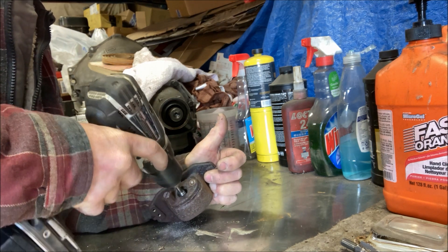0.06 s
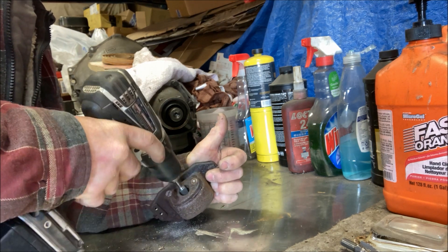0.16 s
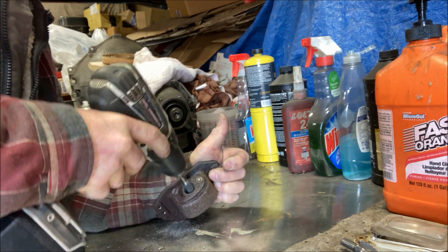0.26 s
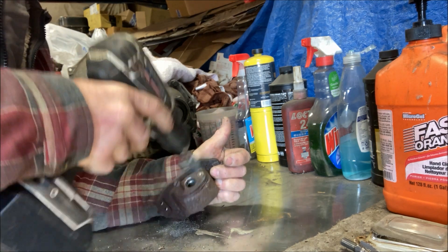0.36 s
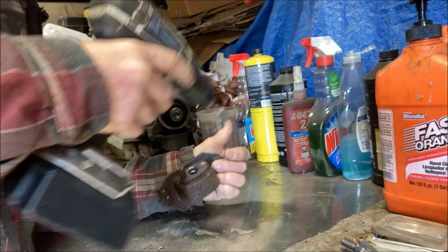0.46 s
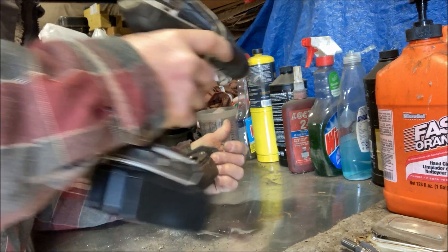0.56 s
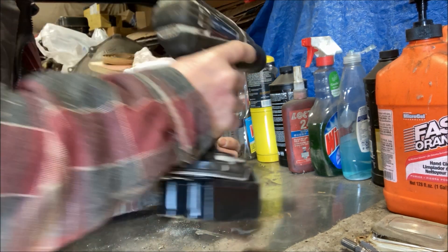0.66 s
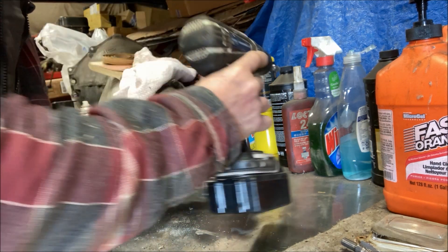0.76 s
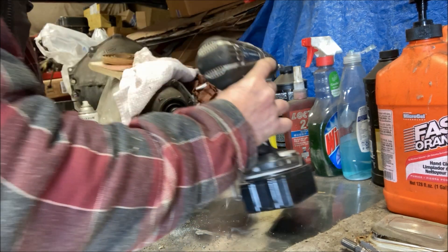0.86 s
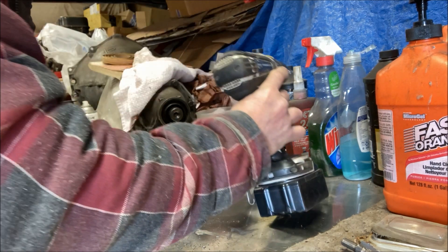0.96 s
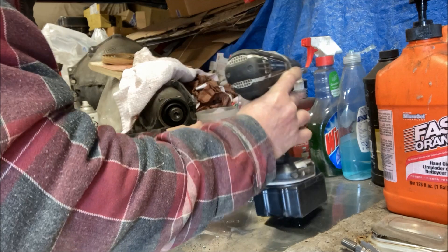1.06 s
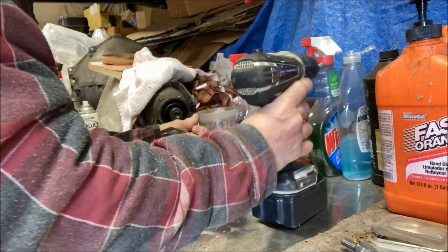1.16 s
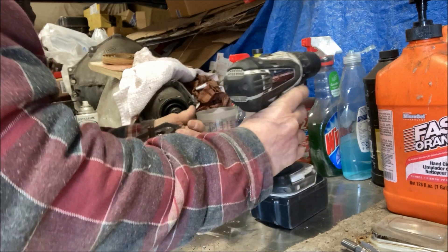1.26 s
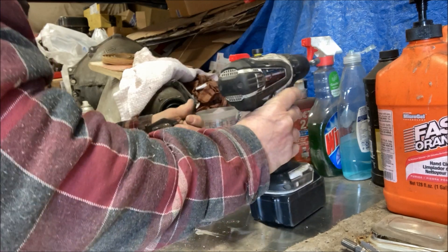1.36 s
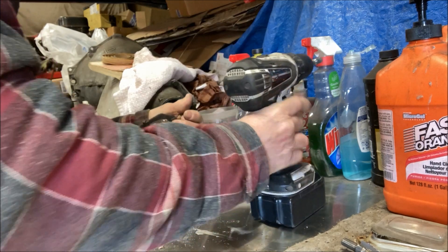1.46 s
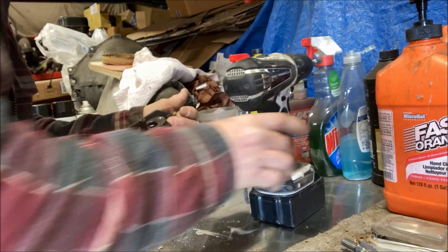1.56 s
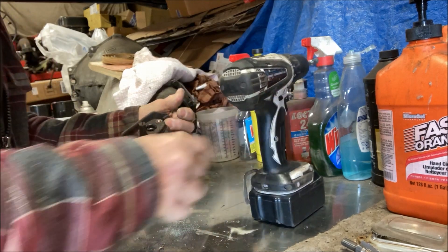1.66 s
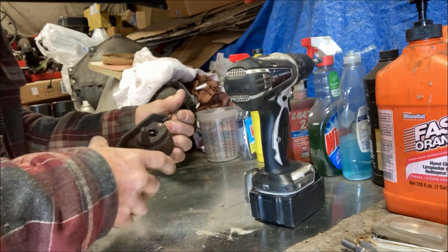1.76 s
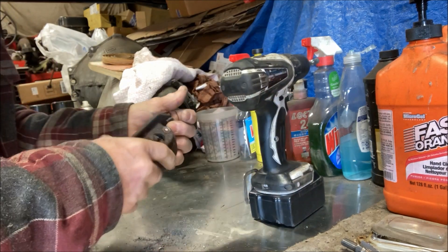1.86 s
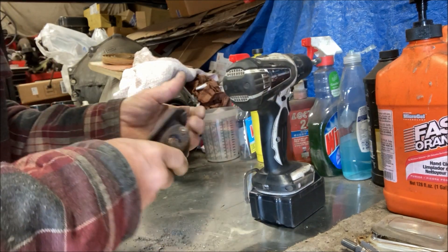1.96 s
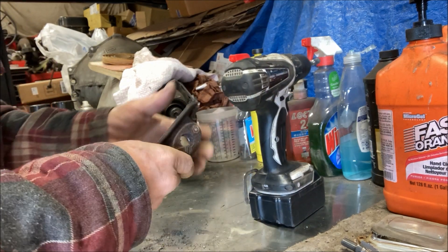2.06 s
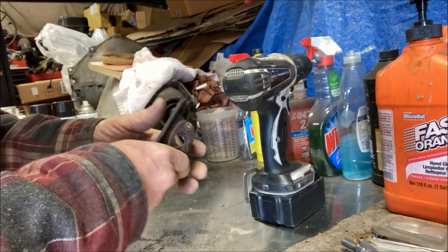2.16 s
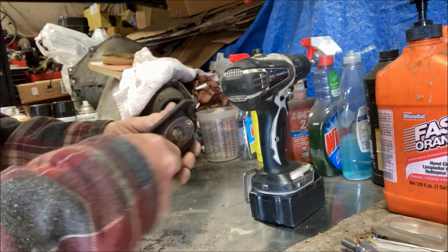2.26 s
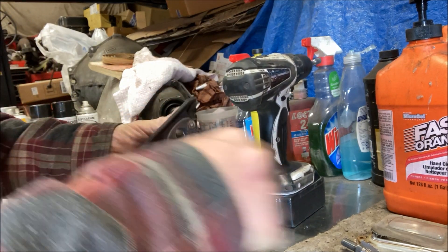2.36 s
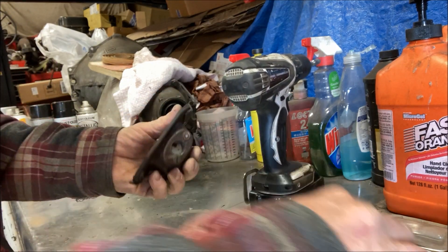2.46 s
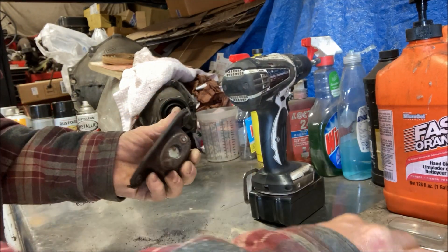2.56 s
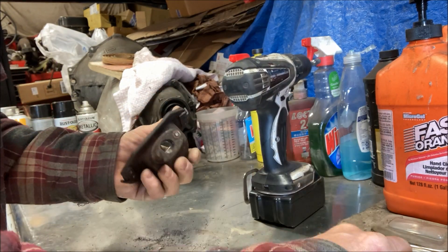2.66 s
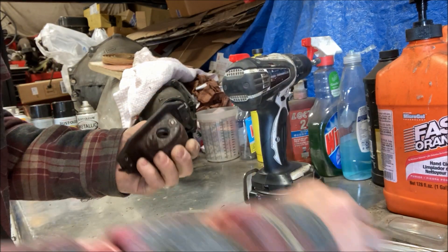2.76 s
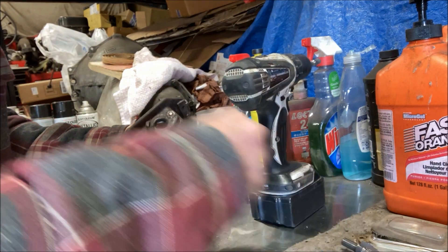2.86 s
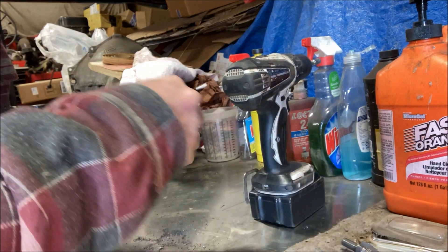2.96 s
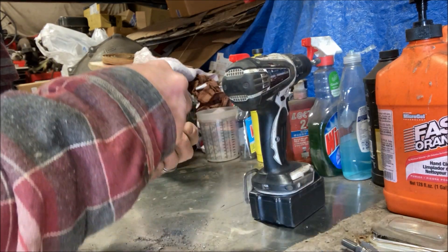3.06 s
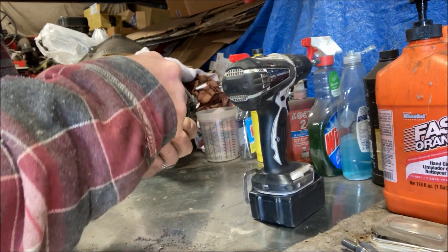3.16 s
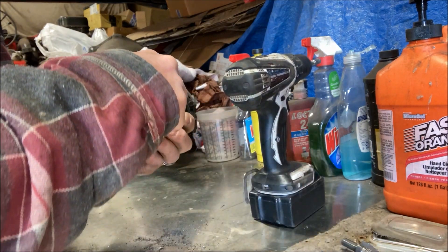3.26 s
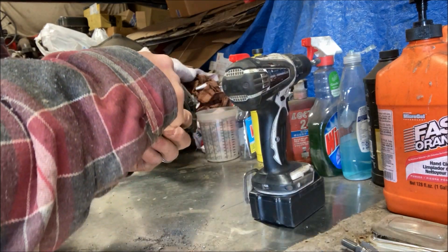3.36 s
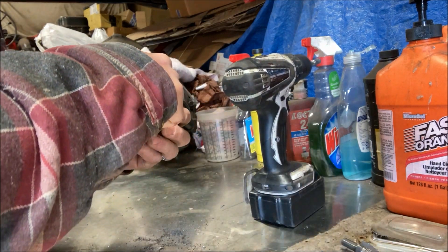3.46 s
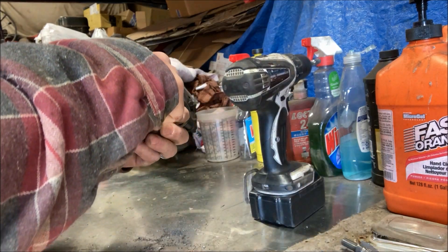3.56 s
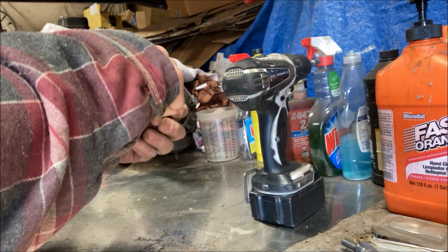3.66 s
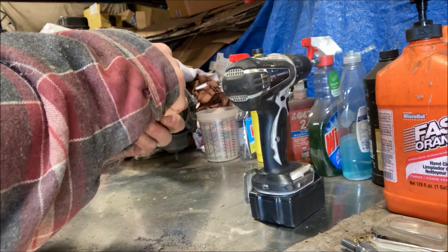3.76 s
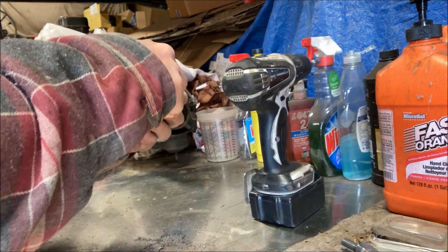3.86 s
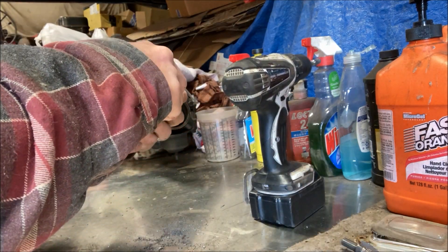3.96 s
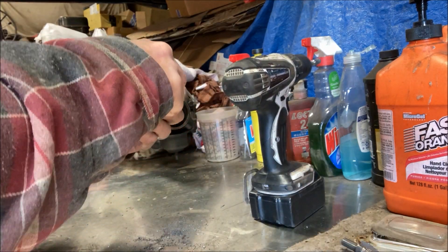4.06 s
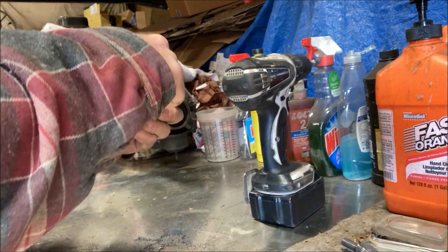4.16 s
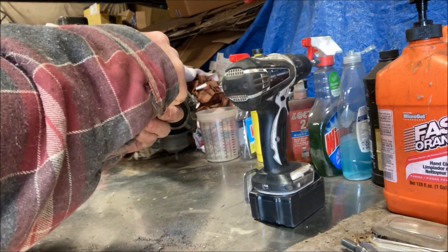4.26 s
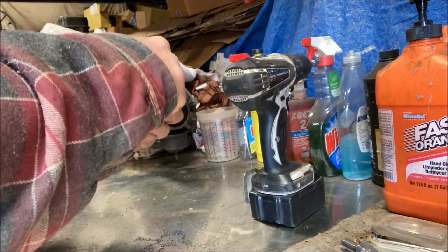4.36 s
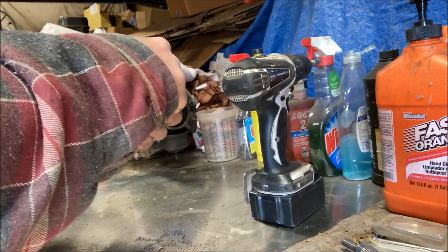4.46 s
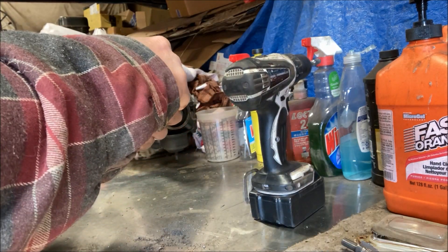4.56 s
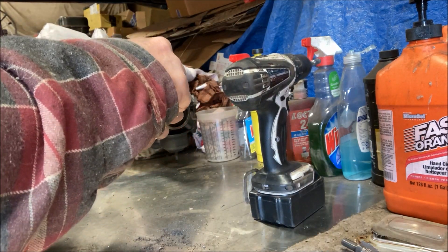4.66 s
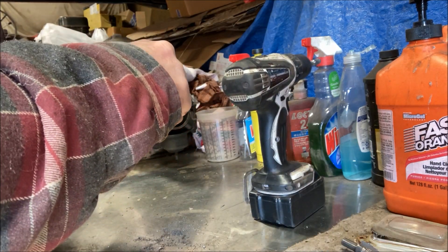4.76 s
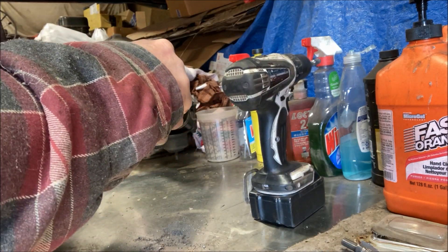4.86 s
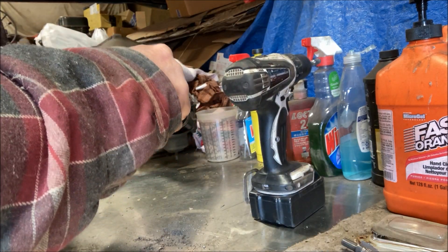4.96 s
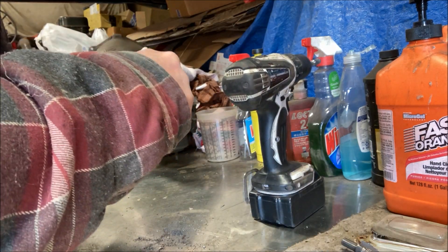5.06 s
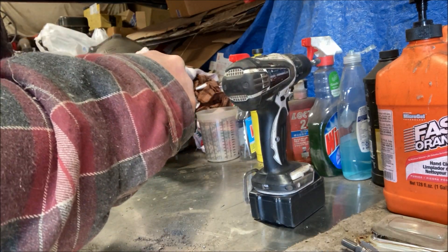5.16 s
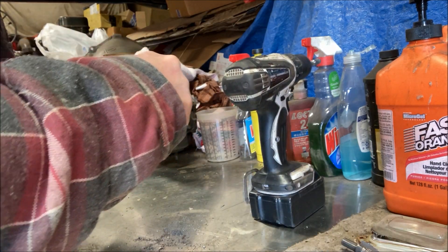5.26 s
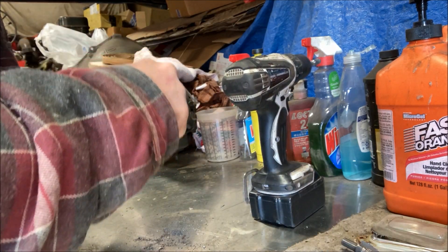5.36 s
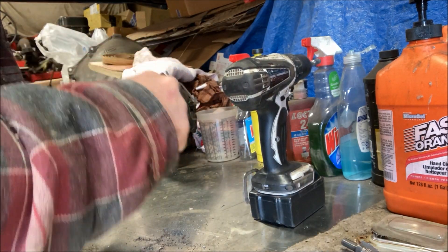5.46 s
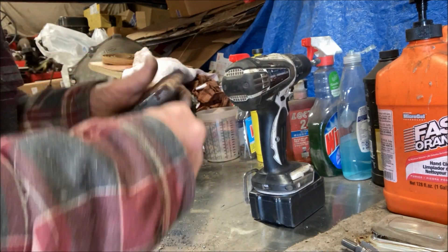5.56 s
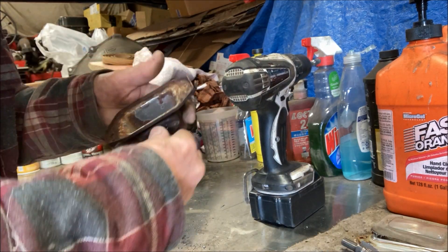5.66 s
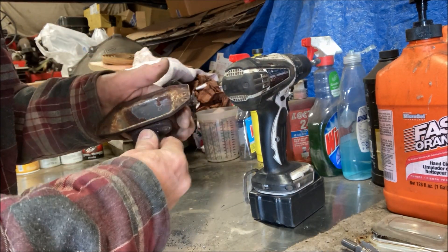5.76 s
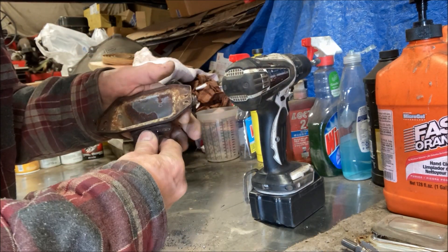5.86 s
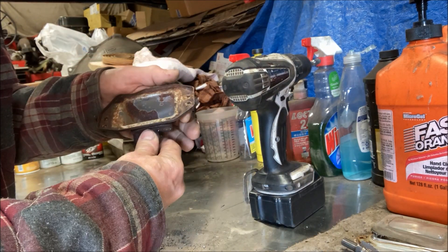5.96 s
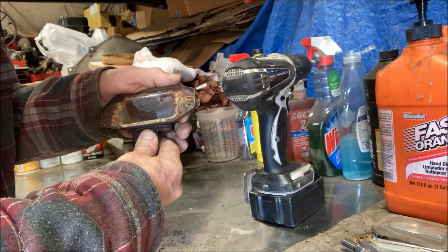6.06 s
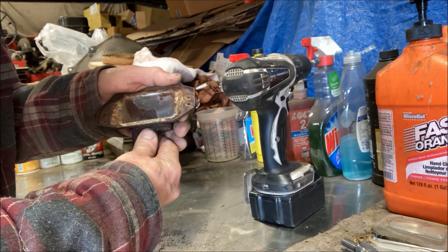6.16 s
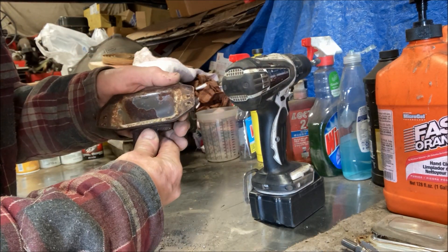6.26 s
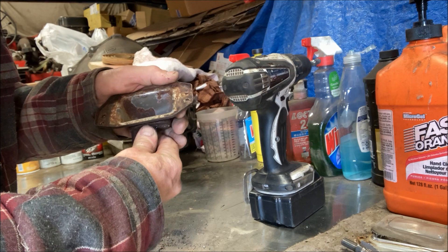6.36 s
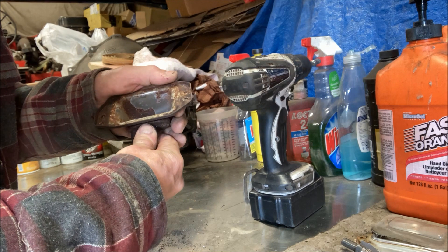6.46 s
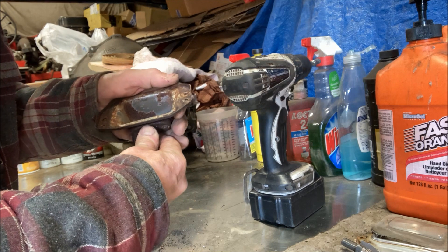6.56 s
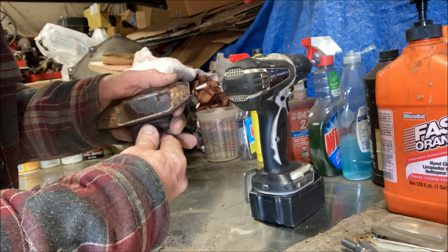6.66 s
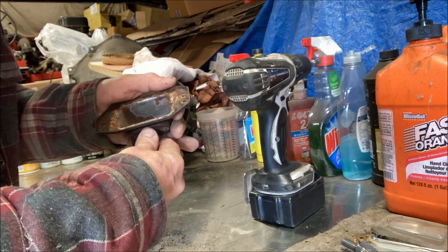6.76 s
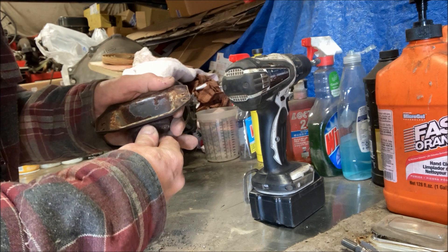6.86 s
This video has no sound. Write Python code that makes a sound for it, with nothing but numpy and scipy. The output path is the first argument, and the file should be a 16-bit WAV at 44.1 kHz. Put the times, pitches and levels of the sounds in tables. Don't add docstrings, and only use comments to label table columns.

```python
import sys
import numpy as np
from scipy import signal
from scipy.fft import rfft, irfft, next_fast_len
from scipy.io import wavfile
from scipy.ndimage import uniform_filter1d

SR = 44100
rng = np.random.default_rng(int(sys.argv[2]) if len(sys.argv) > 2 else 0)


def bounce(signal):
    frames = np.transpose(np.atleast_2d(signal))
    limited = np.clip(frames, -1, 1)
    pcm = np.round(limited * 32767).astype(np.int16)
    wavfile.write(sys.argv[1], SR, pcm)


def rack_gain(trim_db):
    fader = np.asarray(trim_db, float)
    return 10 ** (fader / 20)


N = 304271

# start_s [s], level_db [dB], crack_db [dB], low_body_db [dB], upper_modes_db [dB]
KNOCKS = [(1.084, -13, -13.5, -5, -3.5), (1.098, -17.5, -22, -5.5, -6), (1.165, -21, -30.5, -11.5, -8),
          (1.276, -29, -16, 0.5, -8.5), (1.326, -21.5, -27, -3.5, -1), (1.421, -30.5, -22, -2, -7.5),
          (1.434, -26.5, -16.5, -1.5, -6.5), (1.553, -25.5, -27, -5, -14.5), (1.711, -28.5, -29, -3.5, -5),
          (1.826, -32, -40, -3, -20), (1.950, -41.5, -19, -4, -15), (1.964, -32, -22.5, -2.5, -5),
          (2.058, -31, -36, -6, -24), (2.183, -34.5, -20, -1, -0.5), (2.263, -33.5, -38, -5, -21),
          (2.375, -33.5, -7, -3.5, -6), (2.437, -37.5, -17.5, -3.5, -44), (2.547, -39, -31, -4.5, -7),
          (2.726, -44, -14.5, -3, -6.5)]
# frequency_hz [Hz], density_db [dB per Hz]
RUSTLE = [(400, -6.5), (1000, -1.5), (2500, 0.5), (5000, -7.5), (7000, -10), (12500, -10.5), (15700, -21.5),
          (16000, -51)]


def read(points, hz, order=1):
    table = np.transpose(points)
    return np.interp(np.log(hz + 1), np.log(table[0] + 1), table[order])


def evened(x):
    return x / np.sqrt(np.mean(x ** 2) + 1e-20)


def add(mix, s, sound):
    part = mix[round(s * SR):][:len(sound)]
    part += sound[:len(part)]


def play(voice, rows):
    mix = np.zeros(N)
    for s, *settings in rows:
        add(mix, s, voice(*settings))
    return mix


def resonate(x, hz, width):
    turn = np.exp(2j * np.pi * np.cumsum(hz * np.ones(len(x))) / SR)
    r = np.exp(-np.pi * width / SR)
    return 2 * (turn * signal.lfilter([1 - r], [1, -r], x / turn + 1e-18)).real


def coloured(x, spectrum):
    hz = np.fft.rfftfreq(len(x), 1 / SR)
    gain = rack_gain(read([(5, -90)] + spectrum + [(17000, -90)], hz))
    return evened(irfft(rfft(x) * gain, len(x)))


def gritty(size, per_s, spread_db):
    steps = rng.standard_normal(int(size / SR * per_s) + 3)
    loudness = np.interp(np.arange(size) / SR * per_s, np.arange(len(steps)), steps)
    return rng.standard_normal(size) * rack_gain(spread_db * loudness)


def patchy(x, spread_db):
    z = signal.stft(x, nperseg=256)[2]
    patches = uniform_filter1d(rng.standard_normal(z.shape), size=3, axis=0)
    patches = uniform_filter1d(patches, size=10, axis=1)
    return evened(signal.istft(z * rack_gain(spread_db * evened(patches)), nperseg=256)[1][:len(x)])


def bright(size):
    noise = rng.standard_normal(size + 2)
    return noise[2:] - noise[:-2]


def driver():
    # start_s [s], bite_db [dB], looseness_db [dB]
    spin = [
        (0.0, -29.5, -24),
        (0.18, -30, -24),
        (0.208, -28.5, -35),
        (0.316, -27, -25.5),
        (0.358, -30, -24.5),
        (0.404, -31, -20.5),
        (0.444, -35, -34.5),
        (0.458, -32, -43),
        (0.476, -28.5, -32.5),
    ]
    # start_s [s], pitch_hz [Hz]
    speed = [
        (0, 1220),
        (.08, 1244),
        (.17, 1248),
        (.3, 1252),
        (.39, 1217),
        (.45, 1148),
        (.47, 1084),
    ]
    # frequency_hz [Hz], density_db [dB per Hz]
    hiss_colour = [(60, -3.5), (150, -13.5), (600, -10.5), (1300, -10.5), (2000, -15), (3200, -13),
                   (4600, -12), (6200, -16.5), (9000, -10), (12000, -15.5), (14500, -19.5), (15700, -21),
                   (16000, -57)]
    # multiple [of mesh pitch], level_db [dB], slowing_db [dB gained per 100 Hz of slowing]
    mesh = [(1, -7, 0), (2, -2, 2), (3, -3, 7), (3.25, -8, 0), (3.57, -6, 0), (3.8, -5, 0), (4, 6, -6),
            (5.93, -6, 0), (6.45, -6, 0), (6.72, -6, 0), (7.42, -6, 0), (9.18, -8, 0)]
    # frequency_hz [Hz], width_hz [Hz], level_db [dB]
    part_modes = [(84, 15, -6), (237.5, 8.3, 1.5), (287, 90, 4.5), (445, 40, -10.5), (458, 26, -8),
                  (620, 250, -18), (983, 120, -5.5), (1330, 160, -9)]
    # start_s [s], level_db [dB], pitch_hz [Hz]
    jolts = [(0.003, -17, 296.2), (0.042, -17.5, 250), (0.085, -15, 240.7), (0.127, -19.5, 230),
             (0.165, -18.5, 270.5), (0.203, -27, 259), (0.249, -29.5, 249), (0.292, -25.5, 247.8),
             (0.335, -23.5, 228), (0.371, -21, 286), (0.393, -20, 221), (0.43, -29, 256)]
    chuck_hz, whine_db = 25.75, -38
    s, *columns = np.transpose(spin)
    t = np.arange(0, s[-1], 1 / SR)
    bite_db, looseness_db = (np.interp(t, s, c) for c in columns)
    mesh_hz = np.interp(t, *np.transpose(speed))
    hiss = rack_gain(bite_db + 5) * patchy(coloured(gritty(len(t), 700, 2.8), hiss_colour), 2.8)

    turns = np.cumsum(mesh_hz * (1 + .001 * np.sin(2 * np.pi * chuck_hz * t))) / SR
    slowing = (mesh_hz.max() - mesh_hz) / 100
    whine = np.zeros(len(t))
    for multiple, db, slowing_db in mesh:
        waver = evened(uniform_filter1d(rng.standard_normal(len(t)), 2500))
        whine += rack_gain(db + 3.0 * waver + slowing_db * slowing) * np.sin(2 * np.pi * multiple * turns)
    housing = rack_gain(0.5) * evened(resonate(rng.standard_normal(len(t)), 3.9 * mesh_hz, 600))

    shake = gritty(len(t), 70, 3.5) * (1.1 + .4 * np.cos(2 * np.pi * chuck_hz * t))
    wobble = sum(rack_gain(db) * evened(resonate(shake, hz, width)) for hz, width, db in part_modes)
    run = hiss + rack_gain(whine_db) * (whine + housing) + rack_gain(looseness_db - 2.5) * evened(wobble)
    run = run * np.clip((s[-1] - t) / 0.013, 0, 1)
    return np.pad(run, (0, N - len(t))) + play(jolt, jolts)


def jolt(db, hz):
    t = np.arange(SR // 10) / SR
    swell = t / 0.014 * np.exp(1 - t / 0.0073)
    return rack_gain(db) * swell * np.sin(2 * np.pi * hz * t)


def landing():
    # start_s [s], level_db [dB], pitch_hz [Hz], t60_s [s]
    thuds = [(0.489, -47, 81.4, 0.23), (1.092, -16, 75, 0.093), (1.141, -21.5, 67.3, 0.022),
             (1.238, -52, 61.9, 0.061), (1.329, -30.5, 82, 0.086), (1.436, -25, 76, 0.047),
             (1.56, -39.5, 66.5, 0.099), (1.712, -37.5, 70.4, 0.15), (1.827, -41.5, 93, 0.043),
             (1.964, -38, 68, 0.11), (2.063, -41, 82.4, 0.07), (2.189, -44, 95, 0.085),
             (2.279, -43, 71.6, 0.13), (2.379, -52, 98.6, 0.14), (2.549, -47.5, 75.4, 0.11),
             (2.748, -34.5, 76, 0.106)]
    hard_ring = .85
    knocks = [(*row, hard_ring) for row in KNOCKS]
    return play(knock, knocks + rocks()) + play(thud, thuds)


def rocks():
    taps = [2.942, 3.205, 3.487, 3.747, 3.991, 4.213, 4.421, 4.615, 4.797, 4.964, 5.119, 5.278, 5.439,
            5.586, 5.884, 6.243]
    first_db, last_db, settle_s = -47, -72.5, 2.3
    crack_db, low_db, upper_db, soft_ring = -13, -5.5, -4.5, 1.1
    s = np.array(taps)
    level_db = last_db + (first_db - last_db) * np.exp(-(s - s[0]) / settle_s)
    return [(start, db, crack_db, low_db, upper_db, soft_ring) for start, db in zip(s, level_db)]


def knock(db, crack_db, low_db, upper_db, ring):
    # frequency_hz [Hz], level_db [dB], t60_s [s]
    steel = [(143, -13, 0.2), (238, 1, 0.44), (460, -1.5, 0.18), (675, -5.5, 0.2), (1100, -9.5, 0.14),
             (1826, -6, 0.091), (2600, -7.5, 0.13), (4480, -27.5, 0.062)]
    # frequency_hz [Hz], level_db [dB], t60_s [s]
    body = [(221, 6, 0.44), (588, -1, 0.094), (649.5, -1.5, 0.05), (940, 4, 0.1), (1032, 4, 0.077),
            (1528, 3.5, 0.062), (1620.5, 3.5, 0.04), (2237, 1.5, 0.08)]
    t = np.arange(SR // 5) / SR
    place, luck, turn = rng.random((70, 3)).T[:, :, None]
    hz = 140 * (4500 / 140) ** ((np.arange(70)[:, None] + place) / 70)
    mix_db = read(steel, hz) + read([(330, low_db), (800, 0.015), (2000, upper_db)], hz)
    start = rack_gain(mix_db + 5 * luck)
    rise = 1 - np.exp(-t * hz / .5)
    fall = np.exp(-np.log(1000) * t / (read(steel, hz, order=2) * ring))
    front = 1 + hz / 900 * np.exp(-t / 0.0037)
    plate = (start * fall * rise * front * np.sin(2 * np.pi * (hz * t + 0.48 * turn))).sum(0)

    body_hz, body_db, body_t60 = np.transpose(body)[:, :, None]
    body_db = body_db + read([(330, low_db), (800, 0), (2000, upper_db)], body_hz)
    body_db = body_db + rng.uniform(-8, 4, body_hz.shape)
    body_hz = body_hz * rng.uniform(.96, 1.04, body_hz.shape)
    plate += (rack_gain(body_db - 60 * t / (body_t60 * ring)) * np.sin(2 * np.pi * body_hz * t)).sum(0)

    crack = bright(len(t)) * (rack_gain(-60 * t / 0.027) + rack_gain(-16.5 - 60 * t / .12))
    return rack_gain(db) * (rack_gain(-18.0) * plate + rack_gain(crack_db - 10.0) * crack)


def thud(db, hz, t60):
    t = np.arange(SR // 3) / SR
    swell = (1 - np.exp(-t / .022)) ** 2 * rack_gain(-60 * t / t60)
    return rack_gain(db) * swell / swell.max() * np.sin(2 * np.pi * hz * t)


def contacts():
    # start_s [s], level_db [dB], centre_hz [Hz], t60_s [s], top_db [dB over the click]
    brake = [
        (.459, -23, 1808, .03, -4),
        (.4765, -5.5, 2950, .016, -4.5),
        (.479, -20, 1280, .025, -10),
        (.499, -18, 2386, .02, -1),
        (.501, -20, 1280, .03, -12),
    ]
    # start_s [s], level_db [dB], centre_hz [Hz], t60_s [s], top_db [dB over the click]
    ticks = [
        (.567, -48, 5000, .02, 4),
        (3.488, -46, 2000, .03, -8),
        (2.166, -50, 1500, .025, -16),
    ]
    # start_s [s], level_db [dB], centre_hz [Hz], top_db [dB over the click]
    clicks = [(1.214, -45.5, 928, -7), (2.516, -54.5, 970, -18), (2.765, -47, 3922, -5),
              (3.056, -57, 1950, -21.5), (3.496, -45.5, 940, -14), (3.517, -49.5, 960, 0.5),
              (3.664, -42, 3345, -21.5), (3.84, -53.5, 2600, 1.5), (4.497, -70, 4700, 3),
              (4.984, -55, 2870, -8), (5.528, -57, 4713, -23), (6.344, -49, 5153, -2),
              (6.394, -62, 5370, -5), (6.521, -66, 5070, -5), (6.786, -50, 1983, -18)]
    # start_s [s], level_db [dB], centre_hz [Hz], top_db [dB over the click]
    clinks = [
        (3.476, -35, 3448, -26),
        (3.585, -51, 1380, -18.5),
    ]
    # start_s [s], level_db [dB], pitch_hz [Hz], t60_s [s]
    snaps = [(.4748, -24, 2900, .008), (.4762, -20, 12200, .006), (.4772, -13, 2900, .003),
             (.4785, -24, 7500, .005), (.4995, -30, 8000, .005), (.5032, -27, 1200, .015),
             (.5705, -52, 12500, .008), (1.077, -46, 3100, .008), (1.0845, -14, 1050, .012),
             (1.104, -36, 4200, .03), (1.2105, -46, 8900, .003), (1.2105, -48, 12000, .004),
             (1.2505, -47, 11500, .004), (1.281, -48, 8500, .003), (1.3287, -35, 4180, .006),
             (1.412, -47, 3300, .005), (1.412, -48, 12000, .004), (1.434, -43, 8800, .006),
             (1.434, -47, 12000, .004), (1.5617, -33, 900, .01), (1.6195, -51, 3950, .006),
             (1.6335, -44, 4220, .008), (1.712, -36, 1500, .008), (1.9635, -47, 8500, .004),
             (1.9645, -34, 1500, .007), (2.1045, -57, 7500, .003), (2.1045, -58, 12500, .003),
             (2.149, -57, 11700, .004), (2.184, -34, 1600, .007), (2.193, -55, 12500, .004),
             (2.306, -61, 3430, .03), (2.354, -50, 1600, .005), (2.3765, -39, 950, .01),
             (2.548, -43, 900, .01), (2.547, -52, 1680, .008),
             (3.454, -60, 8500, .004), (3.464, -61, 5000, .003), (3.4765, -36, 3500, .004),
                    (3.488, -55, 6500, .006), (3.488, -58, 11800, .005), (3.499, -57, 6800, .006),
                    (3.5, -60, 12500, .006), (3.765, -63, 11500, .006), (4.2605, -47, 2500, .005),
                    (4.247, -54, 7800, .012), (4.248, -55, 12500, .012), (4.26, -55, 12500, .01),
                    (3.588, -55, 3600, .012), (4.4985, -60, 8500, .004), (4.4985, -60, 11500, .003),
                    (4.515, -62, 8500, .004), (4.515, -64, 11500, .003), (4.515, -68, 4700, .006),
                    (5.528, -61, 5100, .015), (5.7243, -41, 3100, .003), (5.751, -59, 8200, .006),
                    (5.751, -55, 5120, .03), (5.771, -54, 4500, .008), (5.77, -58, 12000, .006),
                    (6.2435, -64, 1300, .012), (6.345, -58, 2200, .01), (6.345, -57, 7000, .005),
                    (6.3945, -58, 5370, .005), (6.3945, -62, 2700, .012), (6.3945, -63, 12500, .004),
                    (6.519, -62, 5230, .007), (6.7575, -66, 8000, .002), (6.787, -50, 2000, .005)]
    # start_s [s], level_db [dB], pitch_hz [Hz], t60_s [s]
    pings = [(.476, -25, 377, .05), (.477, -19, 1320, 0.026), (.476, -18.5, 2290, .03),
             (.575, -49.5, 3650, 0.079), (.574, -45, 1951, .06), (3.477, -47, 1950, 0.035),
             (3.476, -48.5, 5040, 0.021), (3.476, -48, 6900, 0.018), (2.423, -42, 2950, .04),
             (2.427, -44, 4300, .025), (2.428, -43, 6000, .03), (2.415, -52, 6000, .04),
             (3.574, -49, 2100, .04), (3.572, -54.5, 3900, .03), (4.247, -40, 2200, 0.031),
             (4.259, -39.5, 2200, 0.027), (4.259, -49, 3600, 0.03), (4.26, -52.5, 1495, 0.023),
             (5.675, -55, 4700, .06), (5.678, -58, 960, .1), (5.678, -60, 3500, .08),
             (5.737, -59, 5100, 0.13), (5.762, -66, 950, 0.14), (5.785, -55, 4600, 0.045),
             (6.757, -63, 5000, .02), (6.786, -53.5, 1750, 0.037), (6.786, -48.5, 2250, 0.034),
             (6.786, -54, 1350, 0.026), (6.786, -61.5, 7400, .02)]
    # start_s [s], level_db [dB], pitch_hz [Hz], length_s [s]
    ring = [
        (1.434, -60, 4130, .105),
    ]
    click_t60_s, clink_t60_s = .033, .07
    struck = brake + ticks
    struck = struck + [(s, db, hz, click_t60_s, top_db) for s, db, hz, top_db in clicks]
    struck = struck + [(s, db, hz, clink_t60_s, top_db) for s, db, hz, top_db in clinks]
    return play(click, struck) + play(snap, snaps) + play(ping, pings) + play(sing, ring)


def click(db, hz, t60, top_db):
    t = np.arange(SR // 6) / SR
    burst = rng.standard_normal(len(t)) * (rack_gain(-60 * t / t60) + 2.5 * rack_gain(-60 * t / .007))
    centre = resonate(resonate(burst, hz, 700), hz, 700)
    beside = .4 * resonate(burst, 1.5 * hz, 600) + .3 * resonate(burst, .7 * hz, 400)
    front = .3 * resonate(resonate(burst * np.exp(-t / .002), hz, 3500), hz, 3500)
    top = bright(len(t)) * rack_gain(-60 * t / (.9 * t60))
    body = centre + beside + front
    return rack_gain(db) * (body / abs(body).max() + rack_gain(top_db) * top / abs(top).max())


def snap(db, hz, t60):
    t = np.arange(SR // 20) / SR
    cycles = rack_gain(-60 * t / t60) * (1 - np.exp(-t / .0002)) * np.sin(2 * np.pi * hz * t)
    return rack_gain(db) * cycles / abs(cycles).max()


def ping(db, hz, t60):
    rise_s, fuzz_share = .0012, .9
    t = np.arange(SR // 6) / SR
    fuzz = 1 + fuzz_share * evened(uniform_filter1d(rng.standard_normal(len(t)), 60))
    swell = (1 - np.exp(-t / rise_s)) * rack_gain(-60 * t / t60)
    return rack_gain(db) * swell * fuzz * np.sin(2 * np.pi * (hz * t + rng.random()))


def sing(db, hz, length):
    t = np.arange(0, length, 1 / SR)
    fade = np.clip(t / 0.0055, 0, 1) * np.cos(np.pi / 2 * t / length) ** 0.63
    return rack_gain(db) * np.sin(2 * np.pi * hz * t) * fade


def strokes():
    # start_s [s], length_s [s], level_db [dB], centre_hz [Hz], centre_db [dB over the rest]
    rubs = [(.47, 0.044, -34, 1500, -8), (.572, 0.018, -57, 2180, 5), (1.066, 0.066, -64, 1260, 21.5),
            (1.085, 0.024, -34.5, 3020, -21), (1.25, 0.037, -55.5, 10920, -1.5),
            (1.31, 0.043, -50.5, 3930, -11.5), (1.41, 0.046, -50.5, 8700, -8),
            (1.555, 0.052, -56, 8040, -7), (1.61, 0.06, -59, 4030, 9), (1.69, 0.033, -49, 4000, -15),
            (1.961, 0.017, -54.5, 4010, -7), (2.03, 0.055, -63, 8500, -3), (2.1, .04, -67, 4500, 0),
            (2.29, 0.11, -76.5, 4380, 12.5), (2.385, 0.03, -60, 4200, -7), (2.76, 0.077, -59.5, 3820, -9),
            (3.74, 0.19, -79, 2504, 7), (3.562, 0.03, -69, 1500, 12), (4.243, 0.0259, -60, 2600, -3.5),
            (5.6, 0.062, -68, 1946, -10.5), (5.705, 0.03, -72, 3500, -5), (6.35, 0.03, -75.5, 2488, -5),
            (6.7, 0.051, -74.5, 3990, -19), (6.79, 0.051, -89.5, 1980, 0.5)]
    # start_s [s], length_s [s], level_db [dB], centre_hz [Hz], centre_db [dB over the rest]
    scrapes = [
        (2.408, .032, -53, 4300, -5),
        (5.652, 0.055, -66, 12500, -6),
        (5.732, 0.076, -63.5, 12600, -6),
        (6.698, .035, -71, 12000, 0),
    ]
    return play(rub, rubs) + play(scrape, scrapes)


def rub(length, db, hz, centre_db, colour=RUSTLE):
    grit = coloured(gritty(round(length * SR), 400, 4.5), colour)
    grit = grit + rack_gain(centre_db - 5) * evened(resonate(grit, hz, 1200))
    return rack_gain(db) * grit * signal.windows.tukey(len(grit), .5)


def scrape(length, db, hz, centre_db):
    thin = [(400, -20), (1500, -6), (3000, 0), (5000, -1), (6000, -6), (8000, -3), (12500, -2),
            (15700, -18)]
    return rub(length, db, hz, centre_db, thin)


def hands():
    # start_s [s], rustle_db [dB]
    motion = [(0.541, -54.5), (.67, -66.5), (.82, -59), (1.05, -69), (1.14, -53.5), (1.25, -62.5),
              (1.52, -67.5), (1.69, -59.5), (1.769, -72), (2.0, -69.5), (2.548, -66), (2.67, -79),
              (3.0, -79), (3.2, -84), (3.67, -69), (3.9, -80), (5.5, -86), (6.4, -80)]
    # start_s [s], level_db [dB]
    brake_shake = [
        (0.481, -25),
    ]
    # frequency_hz [Hz], density_db [dB per Hz]
    murmur_colour = [(100, -10.5), (150, -0.5), (250, -2), (450, -11.5), (900, -24), (1600, -34.5)]
    # frequency_hz [Hz], density_db [dB per Hz]
    rumble_colour = [(25, -18.5), (45, -1.5), (90, -5), (140, -10)]
    # frequency_hz [Hz], density_db [dB per Hz]
    quiet_colour = [(300, -7), (800, -12), (1500, -14), (3500, -16), (6000, -21), (13000, -19),
                    (15700, -25), (16000, -59.5)]
    still_db, murmur_db, rumble_db, quiet_db = -86.5, -75.5, -69, -79.5
    murmur_share = .4
    motion_db = np.interp(np.arange(N) / SR, *np.transpose(motion))
    rustle = rack_gain(motion_db) * coloured(gritty(N, 400, 1.0), RUSTLE)
    stir = rack_gain(murmur_db + murmur_share * (motion_db - still_db)) ** 2
    stir = stir + shaking(KNOCKS + brake_shake, under_db=-18.5, rise_s=.03, t60=.45)
    murmur = np.sqrt(stir) * coloured(gritty(N, 14, 3), murmur_colour)
    sway = rack_gain(2 * rumble_db) + shaking(KNOCKS, under_db=-16, rise_s=.06, t60=0.89)
    rumble = np.sqrt(sway) * coloured(gritty(N, 11, 2.5), rumble_colour)
    quiet = rack_gain(quiet_db) * coloured(rng.standard_normal(N), quiet_colour)
    return rustle + murmur + rumble + quiet


def shaking(blows, under_db, rise_s, t60):
    t = np.arange(SR) / SR
    power = np.zeros(N)
    shape = ((1 - np.exp(-t / rise_s)) ** 2 * rack_gain(under_db - 60 * t / t60)) ** 2
    for s, db, *_ in blows:
        add(power, s, rack_gain(2 * db) * shape)
    return power


def shop(x):
    decay = [(100, .3), (500, 0.12), (2000, 0.13), (8000, 0.083)]
    taps = np.zeros(SR // 2)
    at = np.arange(150, len(taps) - 20, 20)
    taps[at + rng.integers(0, 20, len(at))] = rng.choice([-1., 1.], len(at))
    hz, t, z = signal.stft(taps, SR, nperseg=256)
    fall = rack_gain(-60 * t / read(decay, hz)[:, None])
    tail = signal.istft(z * fall, SR, nperseg=256)[1]
    return signal.fftconvolve(x, tail / np.linalg.norm(tail))[:N]


def bench():
    mix = driver() + landing() + contacts() + strokes()
    return mix + rack_gain(-10) * shop(mix) + hands()


def scene():
    return np.array([bench(), bench()])


def band_limit(x):
    return signal.sosfilt(signal.butter(12, 17130, fs=SR, output="sos"), x)


def record(dry):
    # frequency_hz [Hz], likeness [0-1],
    # extra_phase [rad], left_right_db [dB]
    ports = [(60, 0.95, 0, -0.6), (298, .93, -0.2, -1.66), (790, 0.6, -1.4, 2.5), (1700, .45, -2.6, 3.5),
             (2300, 0.78, -.4, 2.5), (3600, 0.5, -2.4, 2.5), (4100, 0.4, 1.2, 2.5), (6000, .5, 0.2, 1.5),
             (7500, .97, 0, 0)]
    port_lag_s = .000247
    size = next_fast_len(N + 2048)
    hz = np.fft.rfftfreq(size, 1 / SR)
    same, extra, balance_db = (read(ports, hz, order=k) for k in (1, 2, 3))
    same = np.clip(same, 0, 1)
    near, other = rfft(dry, size) * (hz < 15720)
    late = np.exp(-1j * (2 * np.pi * hz * port_lag_s + extra))
    left = late * (same * near + np.sqrt(1 - same ** 2) * other)
    both = np.array([left * rack_gain(balance_db / 2), near / rack_gain(balance_db / 2)])
    return band_limit(irfft(both, size)[:, :N])


dry = scene()
out = record(dry)
bounce(out)
```